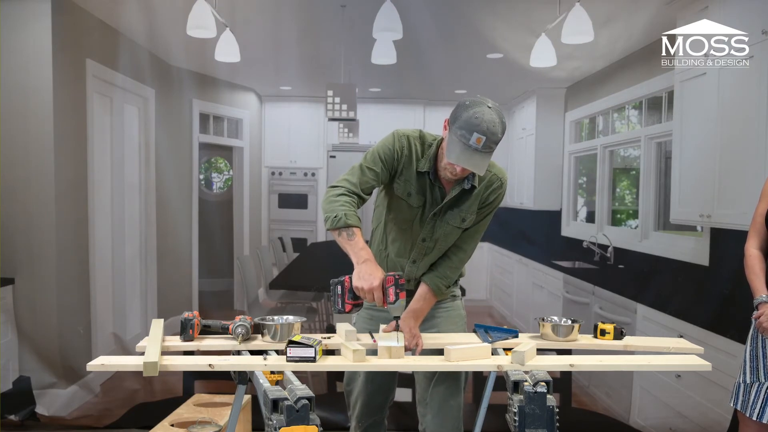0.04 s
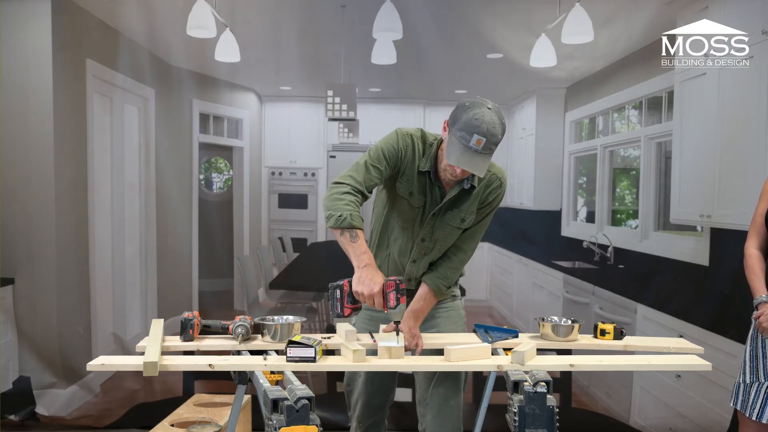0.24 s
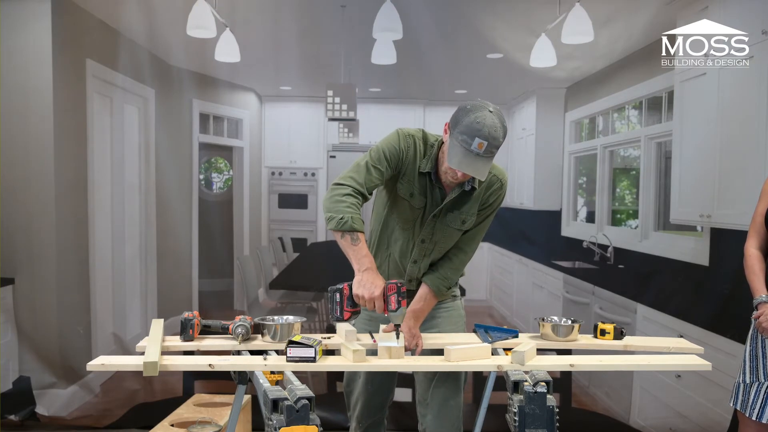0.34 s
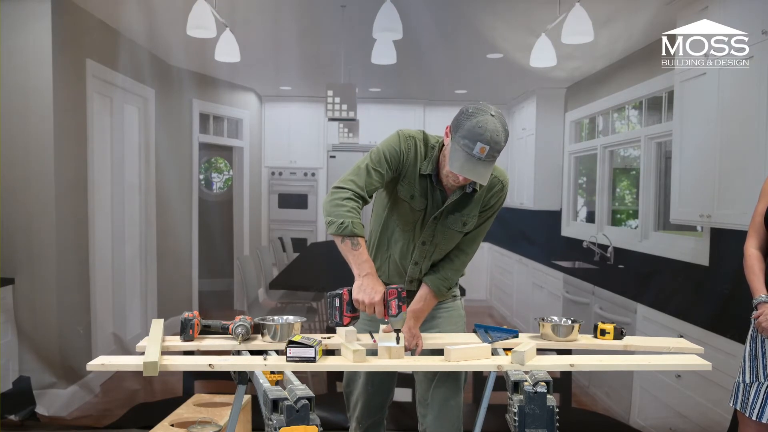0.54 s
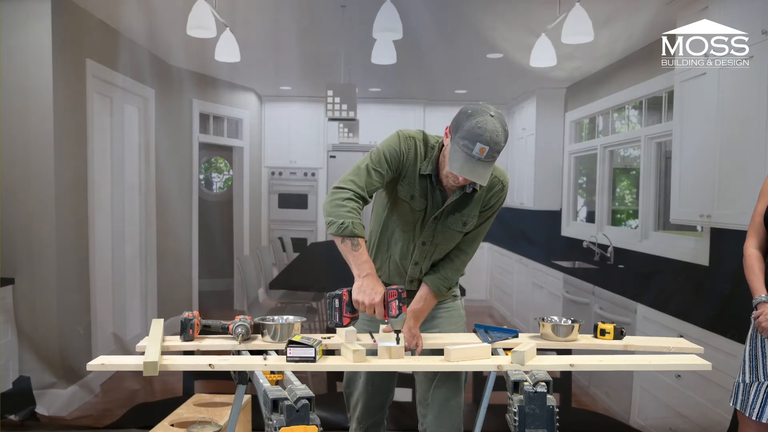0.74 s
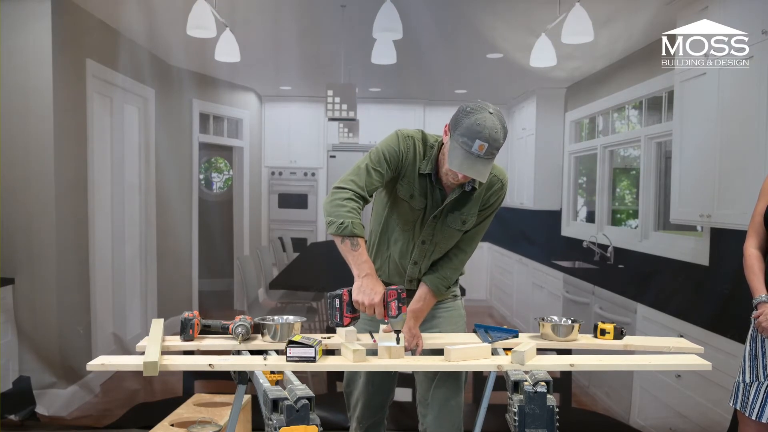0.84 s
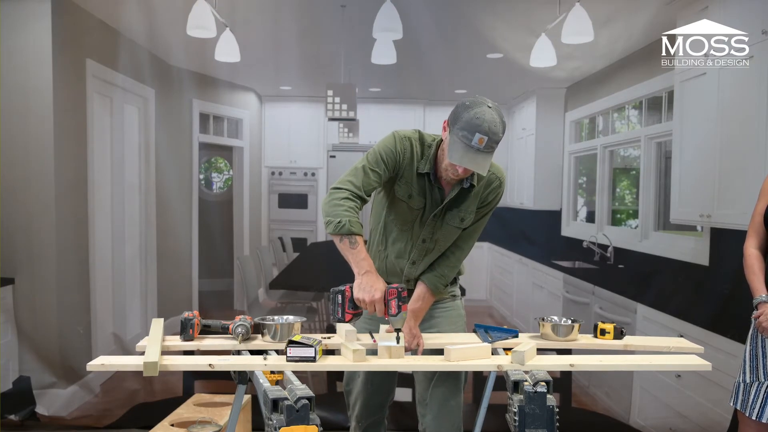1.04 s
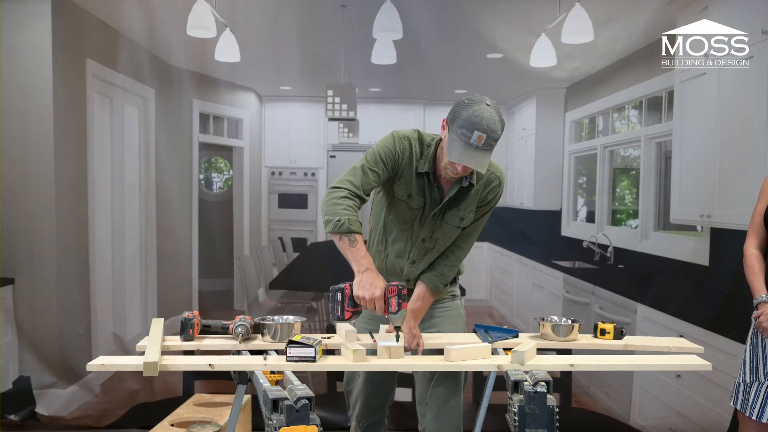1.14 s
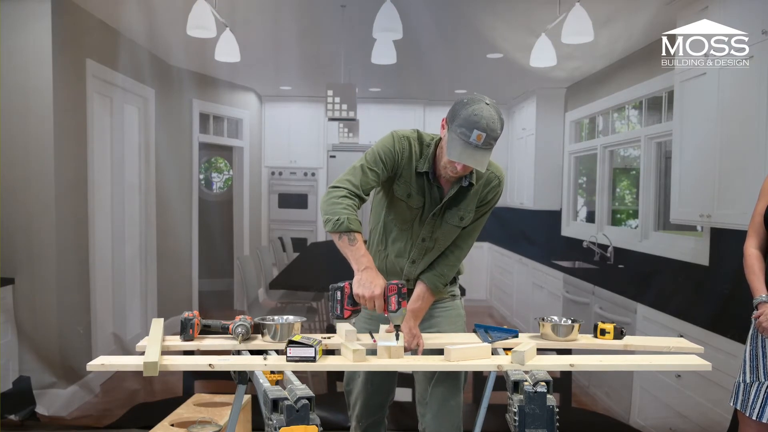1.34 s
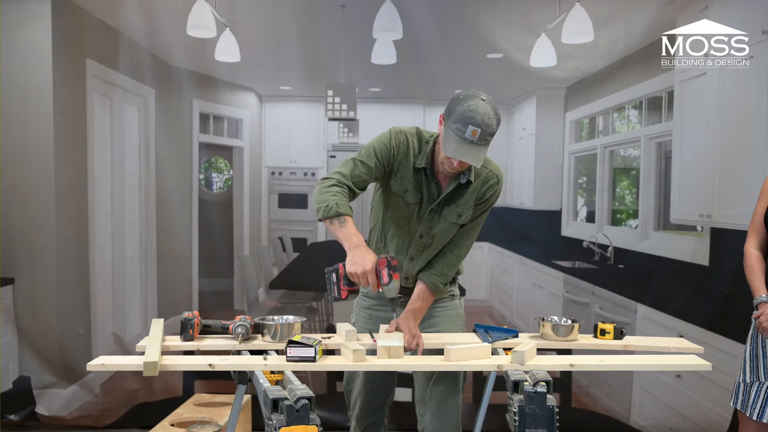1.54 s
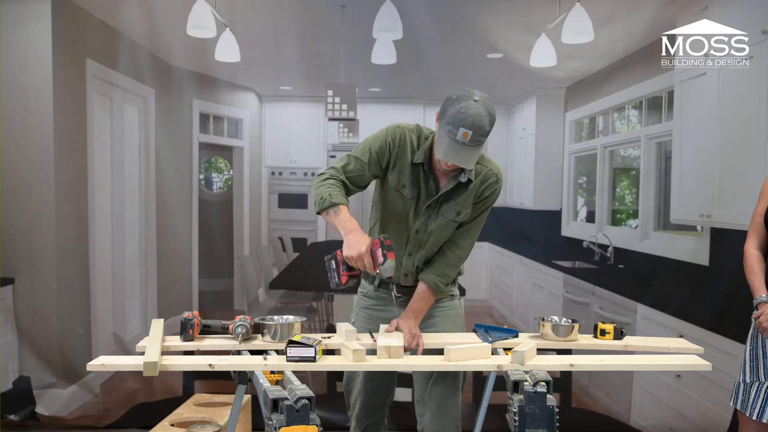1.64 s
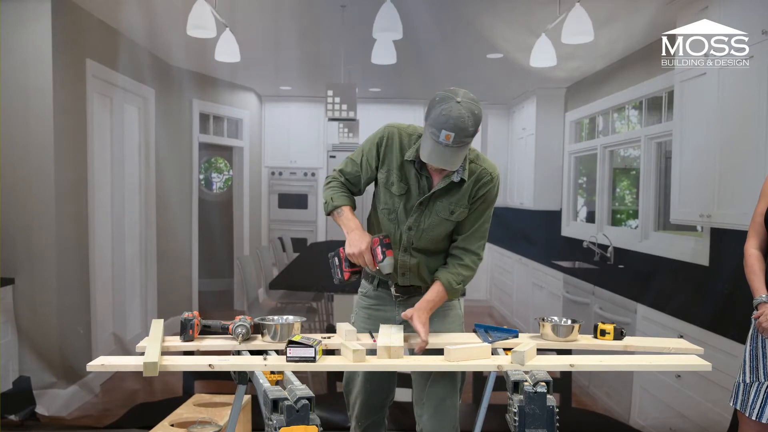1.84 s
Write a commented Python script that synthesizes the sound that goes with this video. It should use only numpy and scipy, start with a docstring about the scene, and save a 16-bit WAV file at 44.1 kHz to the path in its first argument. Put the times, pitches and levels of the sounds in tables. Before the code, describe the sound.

One short run of a power drill biting into wood, growling under load, then braking abruptly.

```python
"""A cordless drill makes one run into a wooden board in a workshop, over a low ventilation rumble with a hum.
The trigger clicks; the motor spins up and whines, as sines locked to its shaft rate. It sags as the bit bites:
gear tones rise with the load, and filtered random impacts make the rattle, the tearing fibres and the board.
On release the brake stops the chuck with a clack, a decaying noise burst with damped modes.
The room rings briefly, by convolution with decaying noise."""
import sys
import numpy as np
from scipy import signal
from scipy.fft import rfft, irfft
from scipy.io import wavfile

SR = 44100
rng = np.random.default_rng(int(sys.argv[2]) if len(sys.argv) > 2 else 0)


def output_pcm(signal):
    """Save a mono or channel-first signal as 16-bit PCM at the path in sys.argv[1].

    Samples are clipped to [-1, 1] before scaling.
    """
    pcm = np.clip(np.atleast_2d(signal).T, -1, 1) * 32767
    wavfile.write(sys.argv[1], SR, np.round(pcm).astype(np.int16))


N = 83790
T = np.arange(N) / SR  # seconds
FREQUENCIES = np.arange(N // 2 + 1) * SR / N  # Hz
GEAR_RATIO = 6.19  # motor turns per carrier turn, and tooth meetings per motor turn


def undb(db):
    """Level law: decibels to amplitude gain."""
    return 10 ** (np.asarray(db) / 20)


def unit(x):
    """Normalization: scale to rms 1."""
    return x / np.sqrt(np.mean(x ** 2))


def walk(hz):
    """Low-passed noise: a smooth random course of rms 1, changing about hz times a second."""
    lowpass = 1 / (1 + (FREQUENCIES / hz) ** 4)
    return unit(irfft(rfft(rng.standard_normal(N)) * lowpass, N))


def colour(x, points):
    """Minimum-phase filtering: a causal filter of unit power through (Hz, dB) points."""
    size = 4096
    hz, db = np.array(points).T
    bins = np.arange(size // 2 + 1) * SR / size
    gain = undb(np.interp(np.log(bins + 1), np.log(hz), db))
    # folding the cepstrum onto positive time makes the filter causal
    cepstrum = irfft(np.log(unit(gain)))
    cepstrum[1:size // 2] *= 2
    cepstrum[size // 2 + 1:] = 0
    impulse_response = irfft(np.exp(rfft(cepstrum)))
    return signal.fftconvolve(x, impulse_response)[:N]


def grains(per_s, spread_db):
    """Shot noise: random tiny impacts of uneven size and either sign, rms 1."""
    chance, size, push = rng.random(N), rng.standard_normal(N), rng.standard_normal(N)
    strength = np.sign(push) * undb(spread_db * np.clip(size, -2, 2))
    return unit((chance < per_s / SR) * strength)


# Whines of motor and fan: three main ones, as multiples of the shaft rate.
WHINE_ORDERS = [11, 15, 22]
# Each row: time in seconds, then the level in dB of each main whine in that order, at full running.
WHINE_DB = [(0.291, -57, -33, -59), (.34, -42.5, -34.5, -43), (0.429, -35.5, -43.5, -51),
            (.53, -68, -35.5, -42), (.72, -43.5, -44, -52), (1.1, -38, -43, -70),
            (1.22, -38.5, -35.5, -44.5), (1.36, -60, -37.5, -44), (1.46, -35, -34, -38),
            (1.55, -42.5, -38, -42.5)]
# Fainter overtones: multiples of the shaft rate, then the level of each in dB at full running.
OVERTONE_ORDERS = [30, 33, 41, 44, 51]
OVERTONE_DB = [-57.5, -58.5, -60, -69, -72]


def motor(turns, flutter_db=1, slip_rad=.12):
    """Order tones: motor poles and fan blades whine at fixed multiples of the shaft rate."""
    shake = slip_rad * walk(71)
    times, *main_levels = np.array(WHINE_DB).T
    levels = [np.interp(T, times, db) for db in main_levels] + list(OVERTONE_DB)
    whine = np.zeros(N)
    for order, db in zip(list(WHINE_ORDERS) + list(OVERTONE_ORDERS), levels):
        gain = np.sqrt(2) * undb(db + flutter_db * walk(27))
        whine += gain * np.sin(2 * np.pi * order * turns + shake)
    return whine


# Gear-tooth harmonics, fundamental first: level in dB at full load, before the shell lifts them.
MESH_DB = [-40, -29, -48.5, -43, -56, -45, -54, -61, -68, -71]
# Resonances of the shell that gear tones glide through. Each row: frequency in Hz, gain in dB.
SHELL = [(1380, -24), (1450, 0), (1520, 5), (1650, 6), (1800, 2), (2850, 1), (3100, -2), (3500, 2),
         (4400, 4.5), (5700, 1), (6000, 5.5), (6300, 8), (6800, 0), (8600, -2), (9500, -0.5), (9900, 3),
         (10250, 2), (11000, 5), (11750, 7), (12600, -9), (14500, -3)]
MESH_LOAD_DB = 26.5  # drop from full load to none
MESH_SLIP_RAD, PLANET_SLIP_RAD = 0.23, 0.1  # phase play of the fundamental
GROWL_DB, GROWL_WIDTH_HZ = -37, 66


def gears(speed, turns, load, flutter_db=2.5):
    """Gear mesh: tooth harmonics grow with load; play and circling planets smear the fundamental to a growl."""
    carrier = 2 * np.pi * turns / GEAR_RATIO
    play = MESH_SLIP_RAD * walk(67) + PLANET_SLIP_RAD * np.sin(carrier)
    mesh = 2 * np.pi * GEAR_RATIO * turns + play
    shell_hz, shell_db = np.array(SHELL).T

    def shell(harmonic):
        """Resonance: gain of the shell at a harmonic of the tooth rate."""
        return undb(np.interp(harmonic * GEAR_RATIO * speed, shell_hz, shell_db))

    tone = np.zeros(N)
    for k, db in enumerate(MESH_DB, 1):
        gain = np.sqrt(2) * shell(k) * undb(db + flutter_db * walk(70))
        tone += gain * np.sin(k * mesh)
    # random sidebands around the fundamental
    smear = walk(GROWL_WIDTH_HZ) * np.sin(mesh) + walk(GROWL_WIDTH_HZ) * np.cos(mesh)
    growl = undb(GROWL_DB) * shell(0.98) * smear
    return (tone + growl) * undb(MESH_LOAD_DB * (load - 1))


# Colour of the fibres. Each row: frequency in Hz, relative level in dB.
FIBRES = [(200, -36), (330, -32.5), (480, -19), (700, -1.5), (900, -4.5), (1350, 0), (2200, -3),
          (3300, -12.5), (5000, -25.5), (9000, -23.5), (15000, -41)]
CUT_DB, CUT_LOAD_DB = -31.5, 13  # level at full load, drop from full load to none


def cutting(turns, load, patchy_db=2.0, lip_db=0.7):
    """Brittle fracture: fibres snap at the cutting lips, in surges as the bit turns."""
    surge_db = patchy_db * walk(75) + lip_db * np.sin(2 * np.pi * turns / GEAR_RATIO)
    snaps = grains(per_s=6000, spread_db=5) * undb(surge_db)
    return colour(unit(snaps), FIBRES) * undb(CUT_DB + CUT_LOAD_DB * (load - 1))


# Colour of the housing. Each row: frequency in Hz, relative level in dB.
HOUSING = [(150, -52), (300, -26), (420, -17.5), (620, -7), (850, -9), (1150, -3), (1900, -3.5),
           (2450, -7.5), (3200, -3), (4350, -5.5), (4900, -11), (6100, -12), (7200, -15), (8700, -15.5),
           (11600, -22), (13500, -31.5), (15500, -42)]
RATTLE_DB, RATTLE_LOAD_DB = -34.5, 1.57  # level without load, rise to full load


def rattle(turns, load, throb=0.32, patchy_db=1.14):
    """Amplitude modulation: dense gear-train ticks bunch three times per motor turn and surge unevenly."""
    bunch = np.cos(2 * np.pi * 3 * turns)
    ticks = grains(per_s=13000, spread_db=0.5) * (1 + throb * bunch)
    return colour(ticks, HOUSING) * undb(RATTLE_DB + RATTLE_LOAD_DB * load + patchy_db * walk(58))


# The bit rubs and shakes the board. Each row: start in seconds, end in seconds, level in dB.
RUBS = [(0.221, 0.276, -38), (0.471, 0.649, -41.5), (0.91, 1.047, -43), (1.178, 1.395, -36)]
# Colour of the board. Each row: frequency in Hz, relative level in dB.
BOARD = [(90, -20), (150, -12), (210, -13.5), (320, -17.5), (420, -4.5), (520, -0.5), (760, 1.5),
         (1050, -3.5), (2000, -13.5), (5000, -52), (15000, -82)]
RUB_EDGE_S = 0.005


def board():
    """Stick-slip friction: the bit drives the low resonances of the board."""
    force = np.zeros(N)
    for start, end, db in RUBS:
        inside = np.minimum(T - start, end - T)  # seconds to the nearer edge
        force += undb(db) * np.clip(inside / RUB_EDGE_S + .5, 0, 1)
    return colour(grains(per_s=1100, spread_db=5) * force, BOARD)


def ring(start_s, modes):
    """Modal decay: damped modes of a small part, struck once."""
    age = np.maximum(T - start_s, 0)
    return sum(undb(db) * np.sin(2 * np.pi * hz * age) * np.exp(-np.log(1000) * age / t60)
               for hz, db, t60 in modes)


# Knocks of trigger, spindle lock and brake. Each row: start in seconds, level in dB.
KNOCKS = [(0.2101, -39), (0.212, -51), (0.2525, -24.5), (0.2593, -21.5), (0.2618, -21), (.2885, -41),
          (1.566, -21.5), (1.574, -53), (1.599, -23.5), (1.602, -23), (1.611, -31)]
# Colour of the knocks. Each row: frequency in Hz, relative level in dB.
KNOCK_COLOUR = [(200, -13), (500, -5), (850, -12), (1600, 2.5), (2400, 1), (3300, 0), (4300, 6.5),
                (6000, -9), (9000, -9.5), (12000, -36), (15000, -36)]
# Modes of trigger switch and chuck as they seat. Each row: frequency in Hz, level in dB, t60 in seconds.
TRIGGER_MODES = [(1185, -45, 0.26), (1720, -56, 0.11), (3170, -42.5, 0.063), (3590, -39, 0.038),
                 (7780, -50.5, 0.12)]
CHUCK_MODES = [(665, -53, 0.17), (722, -40, 0.096), (790, -49, 0.13)]
TRIGGER_S, CHUCK_S = .2105, 1.603  # seating times
KNOCK_S = 0.0012  # decay constant


def knocks():
    """Impact excitation: short hard contacts inside the drill, with the rings of trigger and chuck."""
    force = sum(undb(db) * (T >= start) * np.exp(-abs(T - start) / KNOCK_S) for start, db in KNOCKS)
    contacts = colour(rng.standard_normal(N) * force, KNOCK_COLOUR)
    return contacts + ring(TRIGGER_S, TRIGGER_MODES) + ring(CHUCK_S, CHUCK_MODES)


# Decay of the room. Each row: frequency in Hz, t60 in seconds.
ROOM_T60 = [(300, 0.53), (1000, 0.31), (2300, 0.5), (3400, 0.69), (4200, 0.79), (5000, 0.67), (8000, 0.43),
            (14000, 0.53)]
ROOM_DB, EARLY_DB = -9.5, -8.5  # tail and near reflections, relative to the direct sound
EARLY_S = 0.03  # decay constant


def room(x):
    """Reverberation: near reflections from the bench, then a tail that lasts longest in the low treble."""
    hz, t60 = np.array(ROOM_T60).T
    noise = rfft(rng.standard_normal(N))
    arrived = T > .003
    tail = np.zeros(N)
    # overlapping bands, each with its own decay
    for band, life in zip(np.eye(len(hz)), t60):
        weight = np.interp(np.log(FREQUENCIES + 1), np.log(hz), band)
        tail += irfft(noise * weight, N) * np.exp(-np.log(1000) * T / life)
    tail *= arrived
    early = rng.standard_normal(N) * np.exp(-T / EARLY_S) * arrived
    echo = (undb(ROOM_DB) * unit(tail) + undb(EARLY_DB) * unit(early)) / np.sqrt(N)
    return (x + signal.fftconvolve(x, echo)[:N]) / np.sqrt(1 + np.sum(echo ** 2))


# Colour of the ventilation. Each row: frequency in Hz, relative level in dB.
RUMBLE = [(25, -19), (55, -5.5), (100, -0.5), (160, 0.5), (260, -10), (500, -24), (1200, -32.5),
          (3000, -39), (6000, -46), (9000, -64), (15000, -82)]
RUMBLE_DB, HUM_HZ, HUM_DB = -54, 103.2, -63


def ventilation():
    """Broadband noise with phase modulation: a low rumble with a wavering hum."""
    hum = np.sqrt(2) * np.sin(2 * np.pi * HUM_HZ * T + 0.58 * walk(7.9))
    rumble = colour(rng.standard_normal(N), RUMBLE)
    return undb(RUMBLE_DB) * rumble + undb(HUM_DB) * hum


# Motor speed in spin-up, run under load and braking. Each row: time in seconds, shaft rate in Hz.
SPIN_UP = [(.212, 11), (.238, 45), (.262, 150)]
RUN = [(0.29, 235.7), (0.31, 259.3), (0.328, 272.3), (0.38, 287.5), (0.46, 287.5), (0.662, 252.1),
       (0.696, 252.5), (0.812, 233.4), (0.946, 229.8), (1.058, 231.9), (1.216, 252.8), (1.42, 267.8),
       (1.5, 278.0), (1.55, 276.5)]
BRAKE = [(1.564, 262), (1.615, 59)]
# Load on the bit. Each row: time in seconds, share from 0 to 1.
LOAD = [(.3, 0.1), (.42, 0.57), (.48, 0.68), (.62, 0.8), (.76, 0.89), (1.05, 0.94), (1.15, 0.81),
        (1.25, 0.32), (1.42, 0.3), (1.55, 0)]


def scene(tone_law=5, noise_law=0.74, full_hz=232, release_s=1.558, die_s=0.0053):
    """Common excitation: speed and load drive motor, gears and cutting; tones die at trigger release."""
    speed_rows = np.array(list(SPIN_UP) + list(RUN) + list(BRAKE))
    speed = np.interp(T, *speed_rows.T, left=0, right=0)
    turns = np.cumsum(speed) / SR
    load = np.interp(T, *np.array(LOAD).T)
    running = np.clip(speed / full_hz, 0, 1)
    power = np.exp(-np.maximum(T - release_s, 0) / die_s)
    tones = (motor(turns) + gears(speed, turns, load)) * running ** tone_law * power
    noise = (rattle(turns, load) + cutting(turns, load)) * running ** noise_law
    return (room(tones + noise + board() + knocks()) + ventilation())[None]


def record(dry):
    """Band limiting: a steep elliptic low-pass cuts the top above 15.5 kHz."""
    lowpass = signal.ellip(10, .2, 80, 15500, fs=SR, output="sos")
    return signal.sosfilt(lowpass, dry)


dry = scene()
out = record(dry)
output_pcm(out)
```